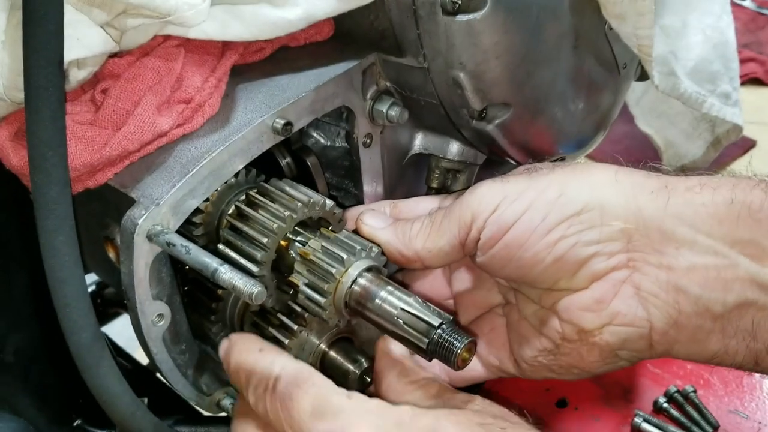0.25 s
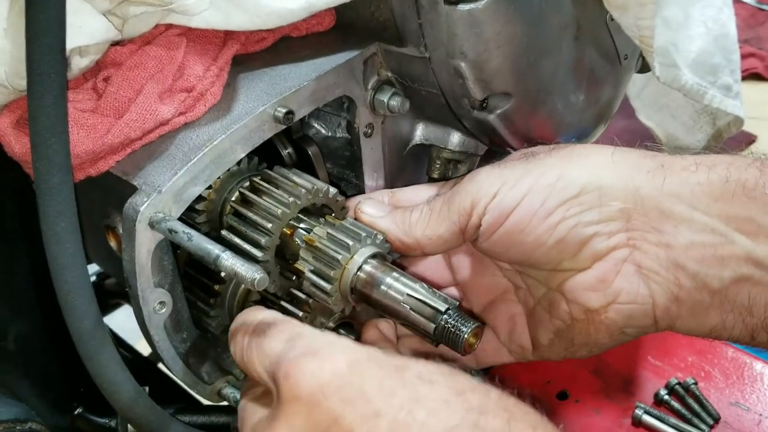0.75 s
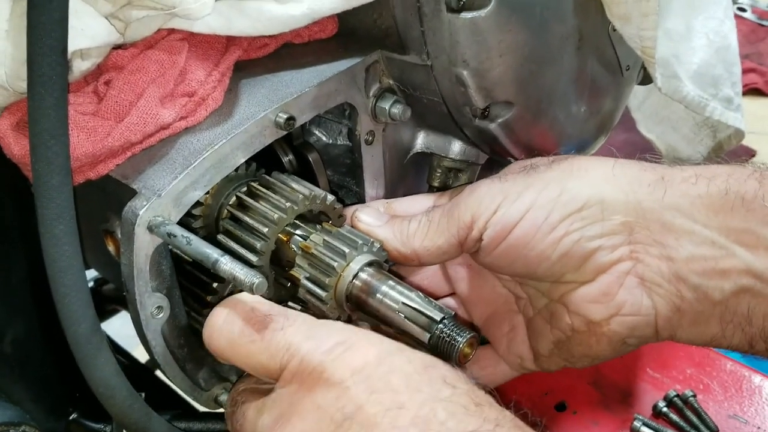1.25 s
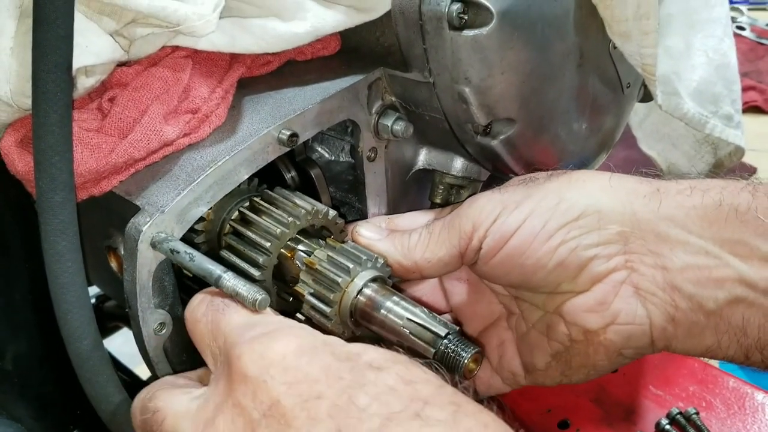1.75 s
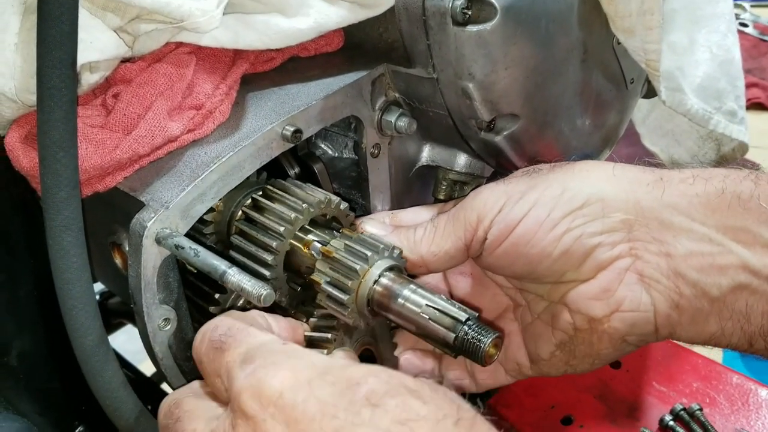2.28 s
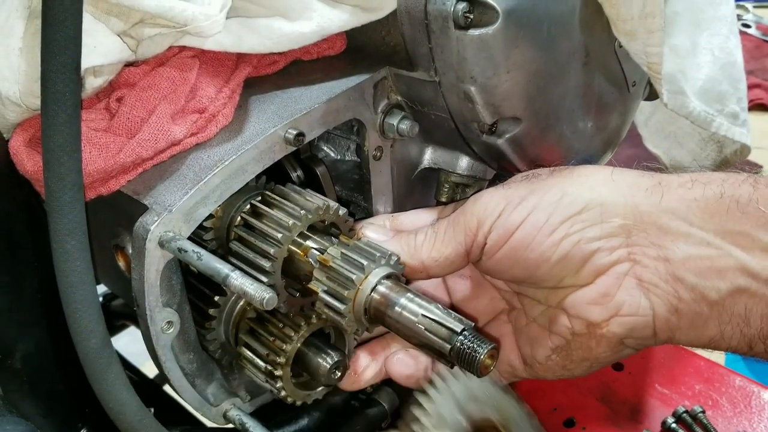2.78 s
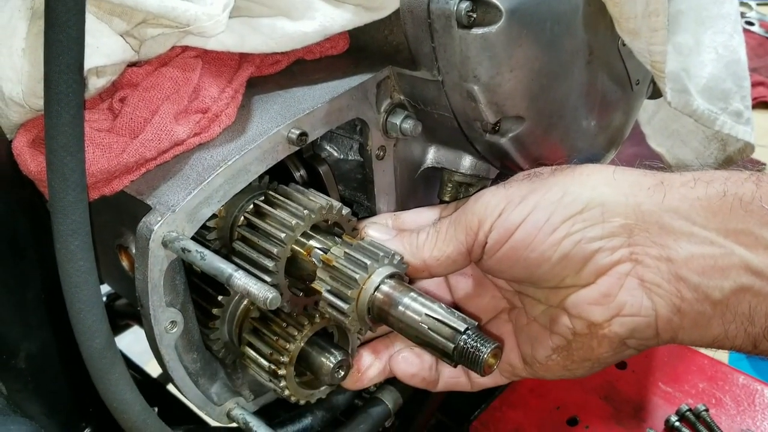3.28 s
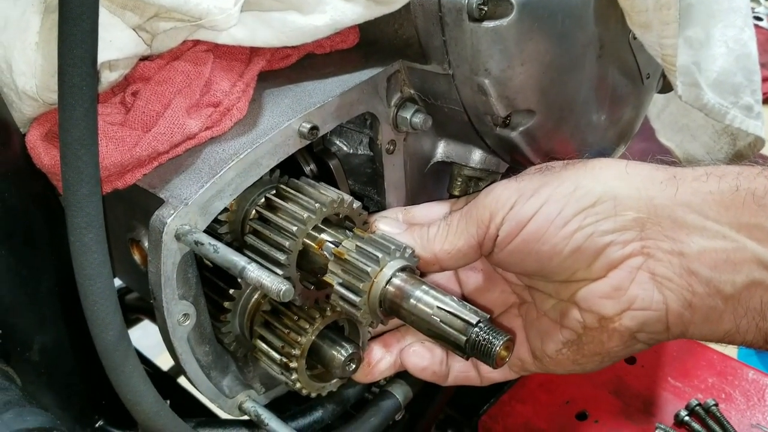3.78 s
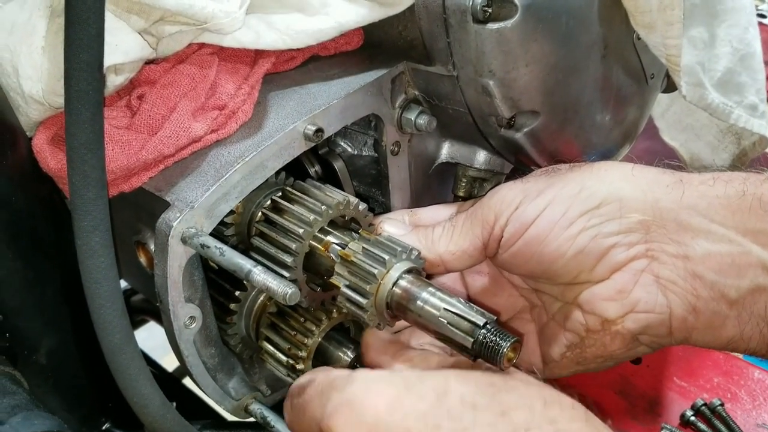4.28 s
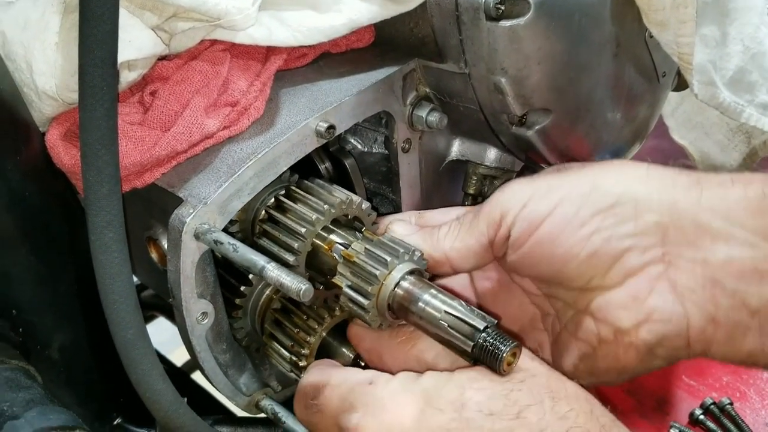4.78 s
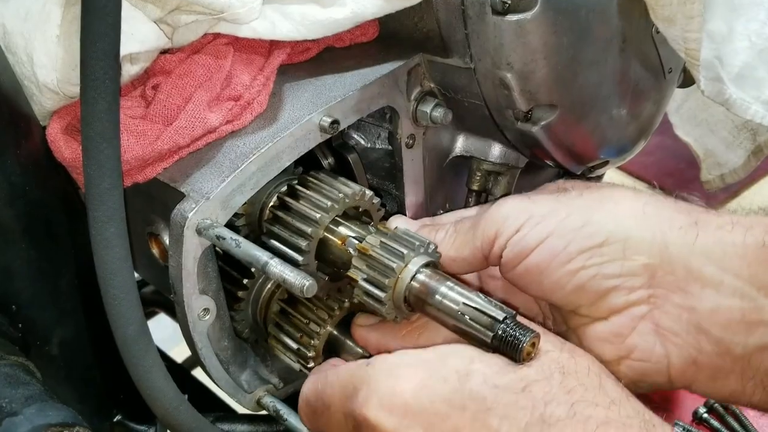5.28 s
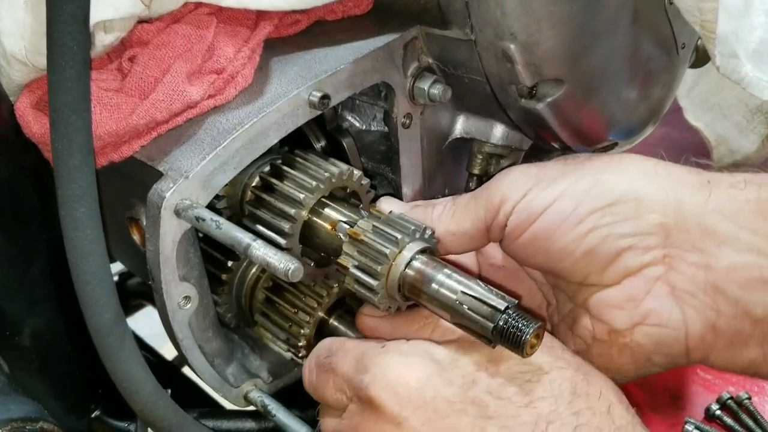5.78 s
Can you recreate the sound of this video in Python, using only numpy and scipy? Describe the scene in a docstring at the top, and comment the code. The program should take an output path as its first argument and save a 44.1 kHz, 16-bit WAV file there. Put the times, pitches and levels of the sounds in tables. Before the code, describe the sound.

Steel gears click, clink and scrape as hands work them along their shafts, with a dull bump midway, close by in a quiet garage.

```python
"""A small garage: steel gears are worked by hand along their shafts into a motorcycle gearbox, close by.
Fingers rub; gears roll, slide, scrape and judder over the splines; a dry bore squeaks by stick-slip.
Parts knock home and ring the frame, shaft and alloy casing; the held shaft pings, teeth tick and clink.
Midway a bird chirps once, far off, and a dull bump sways the machine on its stand.
Quiet room rumble and hiss lie under it all."""
import sys
import numpy as np
from scipy import signal
from scipy.fft import rfft, irfft, next_fast_len
from scipy.io import wavfile
from scipy.ndimage import uniform_filter1d, map_coordinates

SR = 44100
rng = np.random.default_rng(int(sys.argv[2]) if len(sys.argv) > 2 else 0)


def pcm_store(signal):
    """Save signal as 16-bit PCM."""
    levels = np.round(np.clip(np.atleast_2d(signal), -1, 1) * 32767)
    wavfile.write(sys.argv[1], SR, levels.astype(np.int16).T)


N = 266364
TIME = np.arange(N) / SR
AGE = np.arange(SR) / SR
SIDES = np.array([[0.5], [-0.5]])  # splits an L-R difference


def amp(db):
    """Decibels to gain."""
    return 10 ** (np.asarray(db) / 20)


def unit(x):
    """Scale to rms 1."""
    return x / np.sqrt(np.mean(x ** 2) + 1e-20)


def along(points, hz):
    """Read (f/Hz, value) points on a log axis."""
    f, value = np.transpose(points)
    return np.interp(np.log(hz + 1), np.log(f), value)


def wobble(rate_hz):
    """Smooth random curve with rate_hz knots a second."""
    return map_coordinates(rng.standard_normal(int(N * rate_hz / SR) + 4), [TIME * rate_hz])


def filtered(x, response):
    """Apply a frequency response."""
    n = x.shape[-1]
    size = next_fast_len(n + 4096)
    return irfft(rfft(x, size) * response(np.fft.rfftfreq(size, 1 / SR)), size)[..., :n]


def colour(points):
    """Response through (f/Hz, level/dB) points."""
    return lambda f: amp(along(points, f))


def body(modes):
    """Causal response of (f/Hz, width/Hz, level/dB) resonances."""
    return lambda f: sum((-1) ** k * amp(db) * 1j * f * width / (hz * hz - f * f + 1j * f * width)
                         for k, (hz, width, db) in enumerate(modes))


def detuned(modes, spread):
    """Parts ring a little differently wherever they touch."""
    return body([(hz * np.exp(spread * rng.normal()), width, db) for hz, width, db in modes])


def add(track, at_s, sound):
    """Mix a sound into a track."""
    start = max(round(at_s * SR), 0)
    track[start:start + len(sound)] += sound[:N - start]


def contact(response, t60_s, rise_s, snap=0):
    """Dying chatter plus an impulse of height snap, through a response; loudest 5 ms at rms 1."""
    t = AGE[:SR // 6]
    force = rng.standard_normal(len(t)) * amp(-60 * t / max(t60_s, 0.002)) * (1 - np.exp(-t / rise_s))
    force[round(rise_s * SR)] += snap
    sound = filtered(force, response)
    return sound / np.sqrt(uniform_filter1d(sound ** 2, size=220).max())


def stroke(at_s, length_s, attack_s, release_s):
    """Gain of a hand movement: exponential swell up to at_s, hold, exponential decay."""
    return np.exp(np.minimum(TIME - at_s, 0) / attack_s
                  - np.maximum(TIME - at_s - length_s, 0) / release_s)


def strokes(rows, attack_s, release_s):
    """Summed gain of (t/s, length/s, level/dB) strokes."""
    return sum(amp(db) * stroke(at_s, length_s, attack_s, release_s) for at_s, length_s, db in rows)


def friction(spectrum, grain_db, rate_hz):
    """Uneven catches of a rubbed surface; stereo, rms 1."""
    catches = rng.standard_normal((2, N)) * amp(grain_db * wobble(rate_hz))
    return unit(filtered(catches, colour(spectrum)))


def glide(rows, jitter, flutter_db=2, fade_s=0.0075):
    """Unsteady tone bending through (t/s, f/Hz, level/dB) rows."""
    times, *columns = np.transpose(rows)
    hz, db = uniform_filter1d([np.interp(TIME, times, c) for c in columns], size=900, axis=1)
    gate = np.clip(np.minimum(TIME - times[0], times[-1] - TIME) / fade_s, 0, 1)
    flutter = unit(amp(flutter_db * wobble(220)))
    phase = 2 * np.pi * np.cumsum(hz * (1 + jitter * wobble(150))) / SR
    return amp(db) * gate * flutter * np.sin(phase)


# f/Hz, relative level/dB
AIR_SPECTRUM = [(25, -16), (55, -8), (80, -2), (115, 2), (170, -13), (260, -14.5), (500, -20.5),
                (1000, -21.5), (2000, -22), (4000, -27.5), (7000, -31.5), (8500, -31), (15000, -29)]
# f/Hz, L-R correlation
AIR_CORRELATION = [(100, 0.876), (300, 0.45), (700, 0), (2000, 0.015)]
def air(level_db=-68):
    """Room rumble, alike on both sides, under uncorrelated hiss."""
    def response(f):
        angle = np.arccos(along(AIR_CORRELATION, f)) / 2
        return colour(AIR_SPECTRUM)(f) * [np.cos(angle), np.sin(angle)]
    mid, side = filtered(rng.standard_normal((2, N)), response)
    return amp(level_db) * unit(np.array([mid + side, mid - side]))


# t/s, length/s, relative level/dB
RUBS = [(0.22, 0.32, -75), (1.01, 0.15, -70), (1.58, 0.043, -75), (3.94, 0.05, -64.5), (4.7, 0.096, -71.5),
        (4.91, 0.372, -65), (5.57, 0.024, -68)]
# f/Hz, relative level/dB
SKIN_SPECTRUM = [(2000, -18), (3500, -2), (5000, -0.5), (7200, 1), (8300, -12), (11000, -2.5), (15000, -1)]
def rubs():
    """Fingers shift their grip over the faint rustle of the holding hand."""
    pressure = np.hypot(amp(-76), strokes(RUBS, attack_s=0.056, release_s=0.13))
    return pressure * amp(4.5) * friction(SKIN_SPECTRUM, grain_db=1.5, rate_hz=190)


# t/s, length/s, relative level/dB
ROLLS = [(0.3, 0.32, -70.5), (1.14, 0.044, -66.5), (2.29, 0.13, -66), (3.69, 0.25, -75.5),
         (4.38, 0.37, -77.5), (4.9, 0.52, -67.5), (5.59, 0.077, -55), (5.8, 0.11, -64.5)]
def rolls():
    """Gears rumble as they turn in the frame."""
    spectrum = [(70, -18.5), (120, -3), (240, 2), (400, 0), (650, -8), (1100, -38)]
    mid, side = friction(spectrum, grain_db=3.5, rate_hz=53)
    rumble = np.array([mid + 0.64 * side, mid - 0.64 * side])
    return strokes(ROLLS, attack_s=0.047, release_s=0.088) * amp(-2.8) * rumble


# t/s, length/s, level/dB, start f/Hz, end f/Hz, width/Hz, mode 2 level/dB, mode 3 level/dB
SLIDES = [(0.3, 0.18, -74, 1822, 1696, 420, -16, -22), (5.275, 0.062, -64.5, 2153, 2063, 280, -7, -2),
          (5.4, 0.143, -68.5, 1982, 1896, 340, -3, -6), (5.6, 0.24, -66, 1920, 1690, 300, -1, -13)]
# bore modes: ratio to the lowest
BORE_RATIOS = [1, 1.271, 1.7]
def slides(grain_db=4):
    """Sliding friction sounds a gear's bore resonances, which sink as it travels."""
    out = np.zeros(N)
    for at_s, length_s, db, start_hz, end_hz, width_hz, second_db, third_db in SLIDES:
        travel = np.clip((TIME - at_s) / length_s, 0, 1)
        phase = 2 * np.pi * np.cumsum(start_hz * (end_hz / start_hz) ** travel) / SR
        hiss = np.zeros(N)
        for ratio, mode_db in zip(BORE_RATIOS, (0, second_db, third_db)):
            lowpass = lambda f: 1 / (1 + 1j * f / (ratio * width_hz)) ** 3
            i, q = filtered(rng.standard_normal((2, N)), lowpass)
            hiss += amp(mode_db) * unit(i * np.cos(ratio * phase) + q * np.sin(ratio * phase))
        rough = unit(hiss * amp(grain_db * wobble(250)))
        out += amp(db) * stroke(at_s, length_s, attack_s=0.066, release_s=0.045) * rough
    return out


# t/s, relative level/dB, top trim/dB
TICKS = [(0.3642, -61.5, 6), (0.3762, -64, 6), (0.39, -70, 10), (0.621, -69, 17.5), (0.842, -65, -3),
         (1.0463, -41.5, -17), (1.0617, -39.5, -20), (1.209, -51.5, -5), (1.6478, -61, -1),
         (1.6838, -73.5, 19.5), (1.994, -60.5, 18.5), (4.23, -84, 20), (4.4653, -65.5, 0.5),
         (4.643, -66, -1), (4.7138, -56, 1), (4.734, -57, -3), (4.961, -54, 3.5), (5.0967, -50, -1.5),
         (5.1414, -49, -1), (5.155, -44, -13.5), (5.161, -51.5, -10), (5.2215, -59.5, 7),
         (5.4216, -55.5, 8.5), (5.6092, -46.5, -12), (5.6258, -54.5, -2)]
# f/Hz, relative level/dB
TICK_BODY = [(800, -19.5), (2500, -0.5), (4500, -2), (7000, 2), (8500, -24.5), (16000, -22.5)]
TICK_TOP = [(3000, -32.5), (8000, -12), (11000, -9), (15000, 0), (16000, -2)]
def ticks(t60_s=0.023):
    """Tooth tips and oil films touch too lightly to move the casing."""
    out = np.zeros(N)
    for at_s, db, top_db in TICKS:
        add(out, at_s, amp(db - 2.5) * contact(colour(TICK_BODY), t60_s, rise_s=0.0011, snap=3.3))
        add(out, at_s, amp(db + top_db) * contact(colour(TICK_TOP), t60_s, rise_s=0.0019, snap=4.1))
    return out


# t/s, length/s, relative level/dB
DRAGS = [(0.43, 0.04, -84), (1.05, 0.12, -59), (2.448, 0.024, -67), (2.53, 0.043, -70.5), (4.88, 0.26, -70),
         (5.17, 0.1, -69), (5.61, 0.013, -61), (5.88, 0.057, -68.5)]
# f/Hz, relative level/dB
DRAG_SPECTRUM = [(300, 1), (700, -5), (950, 0), (1300, 1), (1700, -4), (2300, -12.5), (3000, -17.5),
                 (5000, -16), (9000, -34.5)]
def drags():
    """Oily steel rubs over steel, slightly left."""
    rasp = friction(DRAG_SPECTRUM, grain_db=3.5, rate_hz=180) * amp([[1.5], [-0.8]])
    return strokes(DRAGS, attack_s=0.021, release_s=0.043) * amp(5) * rasp


# t/s, f/Hz, level/dB
GROAN = [(0.43, 645, -68), (0.455, 601, -71), (0.475, 474, -54.5), (0.495, 450, -71)]
def groan():
    """A gear drags on its shaft with a falling tone."""
    return glide(GROAN, jitter=0.048)


# t/s, level/dB, heft/dB, shaft ring/dB, casing ring/dB, cut-off/Hz (low: oil cushion), grip/0-1
KNOCKS = [(0.4736, -54, -42, -12, 5, 2250, 0.9), (0.4988, -51.5, -40, 0.5, 5.5, 2350, 0.8),
          (0.524, -63, 8, 5, 4, 900, 0.45), (0.681, -59, -4, -0.5, -3, 1477, 0.4),
          (1.0626, -46, -1, 1, 5.5, 6200, 0.28), (1.151, -53.5, -5.5, 3.5, -6, 1700, 0.65),
          (1.168, -57, 2, -20, -10, 260, 0.1), (1.809, -53, -41, 3.5, 5, 2690, 0.7),
          (2.018, -71, -14, 6.5, 5.5, 7000, 0.17), (2.286, -64, 4.5, 0, 2, 6000, 0.1),
          (2.447, -60, -15, 2.5, -7, 1700, 0.77), (2.48, -55, -20, -1, 2, 1190, 0.6),
          (2.556, -55.5, -20, -5, 0, 1000, 0.5), (4.406, -85.5, 25.5, -8, 13, 7000, 0),
          (4.463, -81.5, 22, -7, 4, 7050, 0.3), (4.644, -52, -3.5, 0, 4, 950, 0.3),
          (4.876, -64, 2.5, -13, 2.5, 7000, 0.15), (4.905, -64.5, 10.5, -9, 7.5, 7000, 0.04),
          (4.973, -66.5, 13, -12, 0, 800, 0.6), (4.991, -53, 0, -2, -2, 8000, 0),
          (5.021, -52, -12, 11, -1, 4500, 0.97), (5.596, -48.5, 2.5, -15, 0, 895, 0.2),
          (5.609, -37.5, 1.5, -12, 3, 4500, 0.65), (5.647, -55, 8.5, -15, -2, 700, 0),
          (5.8721, -56, -30, 9, 4.5, 2200, 0.6), (5.9221, -58, 7, -1, -3.5, 1200, 0.55)]
# f/Hz, width/Hz, level/dB
THUD_MODES = [(96.5, 10, -9), (130, 20, 5), (193.4, 12, 3), (234, 15, -4)]
FRAME_MODES = [(311.4, 32.3, 2.5), (432.2, 116, -2), (514, 97, -3), (639, 42, -3), (740, 94, -11)]
SHAFT_MODES = [(915, 69, -8.5), (1226, 42, 2.5), (1262, 30, 4.5), (1400, 220, -5)]
CASING_MODES = [(1771, 200, -9.5), (2210, 250, -3.5), (2342, 250, -2.5), (2545, 160, -5.5)]
EDGE_MODES = [(3150, 200, 4.5), (3660, 239, 2), (4200, 500, -1.5), (4850, 450, 0), (5740, 385, -14.5),
              (6330, 350, -29)]
def knocks(graze_db=-15, crack_db=-12, base_t60_s=0.064, shaft_rise_per_s=0.005):
    """Heavy parts shake the frame; hard contacts reach casing and tooth edges. Returns held, free."""
    held, free = np.zeros((2, N))
    for at_s, db, heft_db, shaft_db, casing_db, cutoff_hz, grip in KNOCKS:
        cushion = lambda f: 1 / np.sqrt(1 + (f / cutoff_hz) ** 18)
        steel = lambda f: f / np.hypot(f, 1100) * cushion(f)
        seating = 1 + shaft_rise_per_s * at_s  # seated deeper, the shaft rings higher
        shaft = [(hz * seating, width * (1 + grip), level) for hz, width, level in SHAFT_MODES]
        # the part grazes before it lands: reversed chatter
        graze = contact(steel, t60_s=0.078, rise_s=0.0015)
        graze *= 1 - np.exp(-AGE[:len(graze)] / 0.0005)
        add(held, at_s - len(graze) / SR, amp(db + graze_db) * graze[::-1])
        blow = amp(crack_db) * contact(steel, 0.35 * base_t60_s, rise_s=0.0011, snap=3.3)
        for modes, ring_db, spread, t60_ratio, rise_s, snap in [
            (THUD_MODES, heft_db + 2.5, 0, 0.71, 0.00089, 13),
            (FRAME_MODES, 0.25 * heft_db - 1.5, 0.013, 1.6, 0.00095, 14),
            (shaft, shaft_db - 2.5, 0.008, 0.5, 0.000982, 11),
            (CASING_MODES, casing_db, 0.032, 0.14, 0.001, 8),
            (EDGE_MODES, 4.5, 0.012, 0.23, 0.001033, 7.4),
        ]:
            centre_hz = np.mean(modes, axis=0)[0]
            response = detuned(modes, spread) if spread else body(modes)
            ring = contact(response, t60_ratio * base_t60_s, rise_s, snap)
            blow += cushion(centre_hz) * amp(ring_db) * ring
        add(held, at_s, amp(db) * grip * blow)
        add(free, at_s, amp(db) * (1 - grip) * blow)
    return held, free


# t/s, level/dB, f/Hz, damped t60/s
PINGS = [(0.681, -59.5, 1285, .018), (1.036, -46, 1360, .015), (1.0483, -41.5, 1310, 0.037),
         (1.0645, -41.5, 1230, 0.021), (1.152, -46, 1253, 0.022), (1.81, -53.5, 1264, .025),
         (2.278, -58.5, 1400, .03), (2.445, -53.5, 1307, 0.037), (2.557, -52, 1370, 0.032),
         (5.021, -33.5, 1410, 0.012), (5.034, -46, 1350, .02), (5.8728, -41.5, 1460, 0.018),
         (5.906, -48.5, 1390, 0.012), (5.9228, -46, 1217, 0.028)]
# ratio to the note, level/dB
PING_MODES = [(0.68, -21.5), (0.89, -15), (1, -1), (1.17, -15), (1.85, -22), (2.4, -23)]
def pings(attack_s=0.00052, free_s=0.0035):
    """A clean hard contact rings the shaft freely for a moment, until the hand chokes it."""
    out = np.zeros(N)
    t = AGE[:SR // 6]
    for at_s, db, hz, t60_s in PINGS:
        ring = sum(amp(mode_db) * np.sin(2 * np.pi * (hz * ratio * t + rng.random()))
                   for ratio, mode_db in PING_MODES)
        envelope = (1 - np.exp(-t / attack_s)) * amp(-60 * np.maximum(t - free_s, 0) / t60_s)
        add(out, at_s, amp(db) * ring * envelope)
    return out


# t/s, level/dB, t60/s
CLINKS = [(1.033, -49.5, 0.018), (1.0433, -31.5, 0.012), (1.046, -14.5, 0.013), (1.047, -24, 0.0087),
          (1.051, -35, 0.0095), (1.0635, -30.5, 0.009)]
# f/Hz, scatter/Hz, level/dB
TOOTH_MODES = [(2060, 30, -10.5), (2580, 30, -7.5), (3700, 30, -17), (4275, 24, -12), (5060, 29.9, -7.5),
               (6370, 16.4, -3), (6720, 9.95, -15), (6790, 11.5, -2), (7400, 15, -7), (14600, 20, -22)]
def clinks(attack_s=0.0011):
    """Tooth strikes tooth and rings high; the gripping hand damps it at once."""
    out = np.zeros(N)
    t = AGE[:SR // 8]
    for at_s, db, t60_s in CLINKS:
        ring = sum(amp(mode_db) * np.sin(2 * np.pi * ((hz + scatter * rng.normal()) * t + rng.random()))
                   for hz, scatter, mode_db in TOOTH_MODES)
        ring *= amp(-60 * t / t60_s) * (1 - np.exp(-t / attack_s))
        add(out, at_s, amp(db) * ring / np.abs(ring).max())
    return out


# t/s, length/s, level/dB, L-R/dB
SQUEAKS = [(1.087, 0.053, -71, 8), (1.32, 0.021, -68, 4.5), (1.816, 0.0055, -70.5, 9),
           (2.292, 0.0069, -64.5, 3.5), (2.435, 0.028, -56, -9), (2.548, 0.014, -68, -8.5),
           (3.568, 0.041, -58, 12.5)]
def squeaks(mode_hz=6885, waver_hz=70, rough_db=5):
    """Stick-slip of a dry bore on its shaft keeps one gear mode singing roughly."""
    gain = sum(amp(db + pan_db * SIDES) * stroke(at_s, length_s, attack_s=0.014, release_s=0.013)
               for at_s, length_s, db, pan_db in SQUEAKS)
    phase = 2 * np.pi * np.cumsum(mode_hz + waver_hz * wobble(350)) / SR
    return gain * unit(np.sin([phase, phase + np.pi / 2]) * amp(rough_db * wobble(250)))


# t/s, tooth edge level/dB, shaft level/dB, rumble level/dB, t60/s
SCRAPES = [(2.282, -69, -68.5, -59.5, 0.038), (2.3, -88, -86, -59.5, 0.23), (2.339, -92, -75, -60.5, 0.36),
           (3.953, -53.5, -69, -64, 0.1), (3.981, -56, -76, -78, 0.14), (5.155, -38, -60, -82, 0.022)]
def scrapes():
    """A gear grazes its splines: all chatter, no blow."""
    edge = body([(2600, 670, 8.5), (3550, 860, -26), (4743, 550, 25.5), (7340, 1200, -9)])
    rumble = body([(215, 81, 6), (314, 140, -3), (410, 55, -7)])
    out = np.zeros(N)
    for at_s, edge_db, shaft_db, rumble_db, t60_s in SCRAPES:
        add(out, at_s, amp(edge_db) * contact(edge, t60_s, rise_s=0.00044))
        add(out, at_s, amp(shaft_db) * contact(body(SHAFT_MODES), t60_s, rise_s=0.00047))
        add(out, at_s, amp(rumble_db) * contact(rumble, t60_s, rise_s=0.0018))
    return out


# t/s, f/Hz, level/dB
JUDDER = [(2.285, 226.9, -73), (2.3, 218, -56), (2.345, 256, -58), (2.39, 245.4, -66), (2.44, 225, -71)]
def judder():
    """A gear judders over its splines with a low, shaky tone."""
    return glide(JUDDER, jitter=0.0935)


# t/s, f/Hz, relative level/dB
CHIRP = [(3.1, 4100, -81), (3.17, 4220, -73.5), (3.21, 4540, -64), (3.242, 4920, -63), (3.275, 4830, -67),
         (3.3, 4510, -69), (3.335, 4500, -65), (3.39, 4140, -77)]
def bird():
    """One far chirp rises and falls, with faint reverb."""
    chirp = glide(CHIRP, jitter=0.003)
    return 0.62 * chirp + garage(chirp, early_db=-18, tail_db=-17)


# t/s, level/dB, low cut/Hz
BUMPS = [(3.5751, -21.5, 50), (3.639, -28.5, 255), (3.693, -39, 420)]
# f/Hz, level/dB, t60/s, rise/s
STAND_MODES = [(81.3, 11, 0.09, 0.022), (122.6, -4, 0.16, 0.014), (197, 2.5, 0.12, 0.0064),
               (196.9, -18.5, 0.92, 0.1), (236.5, -1.5, 0.17, 0.022), (283.3, -23, 0.33, 0.0072),
               (301.3, -14, 0.14, 0.0059), (366, -24.5, .13, 0.0063), (432, -19, 0.076, 0.0068),
               (484.5, -41, 0.24, 0.0048), (563, -42, .15, 0.0022), (714, -39, 0.073, 0.0016)]
def bumps():
    """A soft push sways the machine on its stand; lighter rebounds stir only the higher modes."""
    out = np.zeros(N)
    for at_s, db, low_cut_hz in BUMPS:
        for hz, mode_db, t60_s, rise_s in STAND_MODES:
            gain = amp(db + mode_db) / np.sqrt(1 + (low_cut_hz / hz) ** 12)
            envelope = amp(-60 * AGE / t60_s) * (1 - np.exp(-AGE / rise_s))
            add(out, at_s, gain * envelope * np.sin(2 * np.pi * hz * AGE))
    return out


# f/Hz, t60/s
GARAGE_DECAY = [(120, 0.76), (500, 0.48), (2000, 0.41), (7000, 0.24), (15000, 0.074)]
def garage(x, early_db, tail_db, early_t60_s=0.035, low_cut_hz=130.3):
    """Quick reflections off machine and hands, then the tail of a room too small to sustain bass."""
    hz, t, spectra = signal.stft(rng.standard_normal((2, SR // 2)), SR, nperseg=256)
    tail = signal.istft(spectra * amp(-60 * t / along(GARAGE_DECAY, hz)[:, None]), SR, nperseg=256)[1]
    tail = filtered(tail, lambda f: f ** 2 / np.hypot(f ** 2, low_cut_hz ** 2))
    age = AGE[:tail.shape[1]]
    early = rng.standard_normal(tail.shape) * amp(-60 * age / early_t60_s)
    onset = np.clip(age / 0.00056, 0, 1)
    mid, side = (amp(early_db) * unit(early) + amp(tail_db) * unit(tail)) * onset / np.sqrt(2 * len(age))
    side = filtered(side, lambda f: f / np.hypot(f, 600))  # long waves reach both sides alike
    return signal.oaconvolve(x[None], np.array([mid + side, mid - side]), axes=1)[:, :N]


# f/Hz, L-R/dB
GEARBOX_PAN = [(200, 1), (600, -2.5), (1000, 2.5), (1330, 8.5), (1750, -3.5), (2300, -2.5), (3300, 5.5),
               (5000, -0.5), (6600, 1.5), (8000, 2), (14000, -5.5)]
# f/Hz, left lead/rad
GEARBOX_PHASE = [(160, -.1), (600, .3), (1300, 1.4), (2300, 2.7), (4500, 3.3), (6800, 5.2), (15000, 5.6)]
def placed(x, early_db, tail_db, low_cut_hz):
    """A gearbox sound and its room in stereo; small parts radiate little bass."""
    x = signal.sosfilt(signal.butter(2, low_cut_hz, "highpass", fs=SR, output="sos"), x)
    direct = filtered(x, lambda f: np.exp(1j * SIDES * along(GEARBOX_PHASE, f)))
    return filtered(direct + garage(x, early_db, tail_db), lambda f: amp(SIDES * along(GEARBOX_PAN, f)))


def scene():
    """All sources in the garage; what the hand encloses hardly reaches the room."""
    held, free = knocks()
    metal = placed(free + scrapes() + slides() + groan(), early_db=1, tail_db=-4.5, low_cut_hz=120)
    metal += placed(held, early_db=2, tail_db=-17.5, low_cut_hz=110)
    metal += placed(pings(), early_db=-14.5, tail_db=-21, low_cut_hz=280)
    metal += placed(judder(), early_db=-10, tail_db=-14, low_cut_hz=87)
    teeth = placed(clinks(), early_db=-15, tail_db=-19.5, low_cut_hz=200) * amp(7.5 * SIDES)
    teeth += placed(ticks(), early_db=2.5, tail_db=-2, low_cut_hz=199)
    stand = placed(bumps(), early_db=-17, tail_db=-6.5, low_cut_hz=89)
    return metal + teeth + stand + bird() + squeaks() + rolls() + drags() + rubs() + air()


def record(dry):
    """Brick-wall low-pass."""
    return filtered(dry, lambda hz: hz < 16100)


dry = scene()
out = record(dry)
pcm_store(out)
```